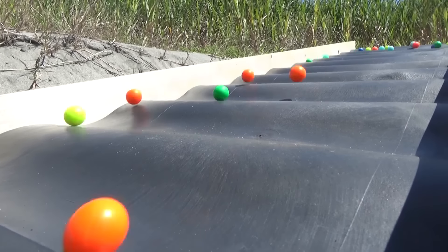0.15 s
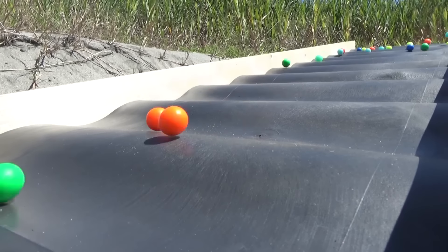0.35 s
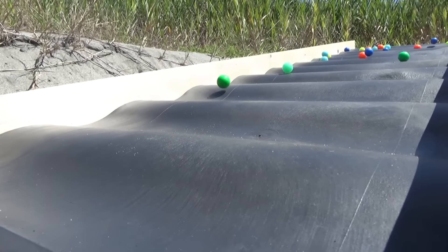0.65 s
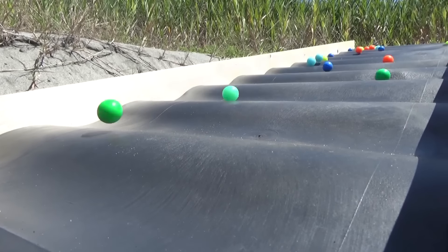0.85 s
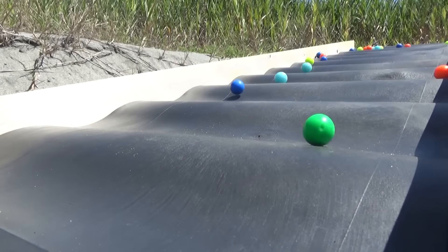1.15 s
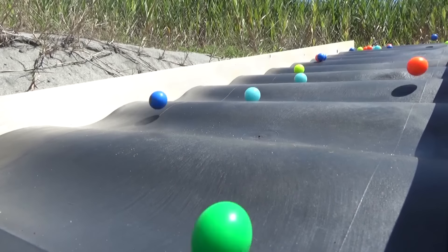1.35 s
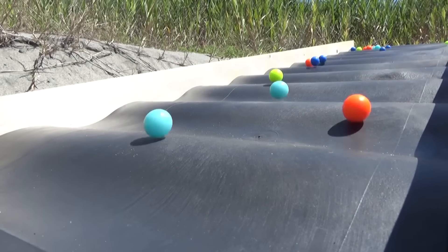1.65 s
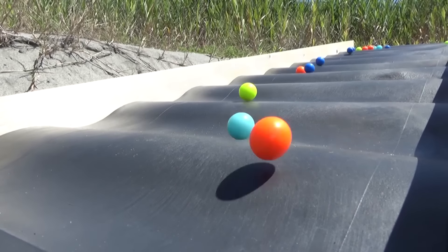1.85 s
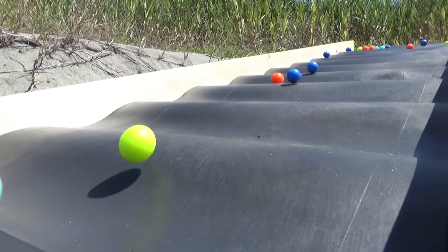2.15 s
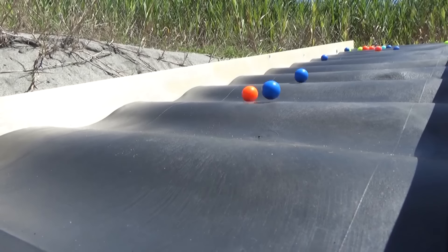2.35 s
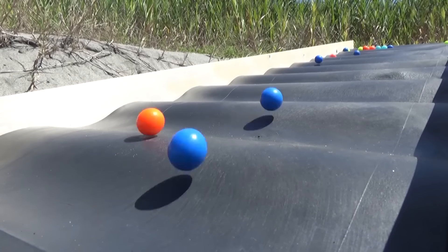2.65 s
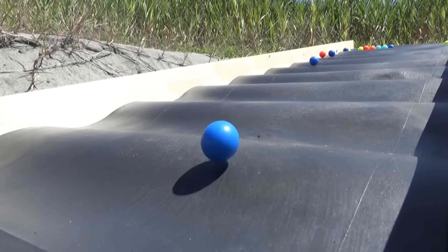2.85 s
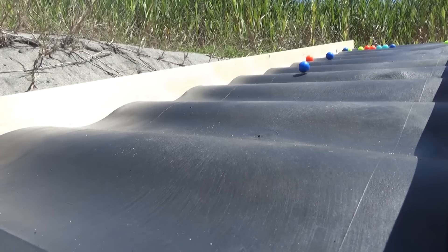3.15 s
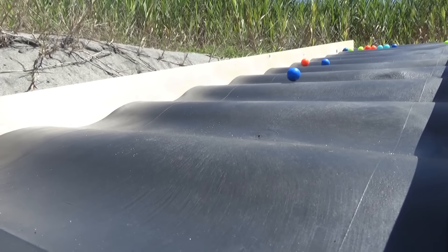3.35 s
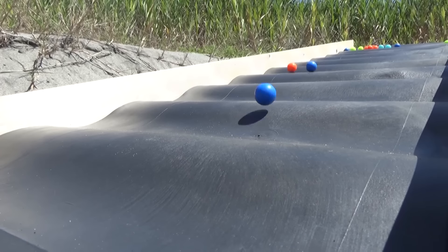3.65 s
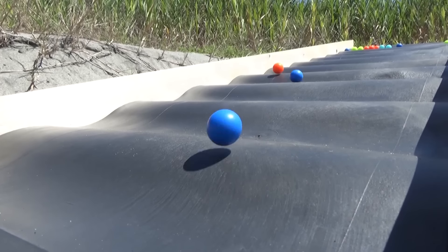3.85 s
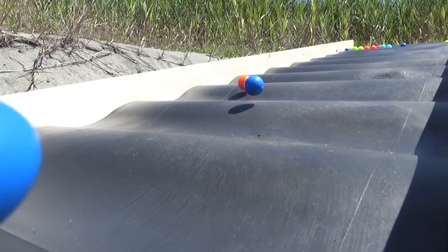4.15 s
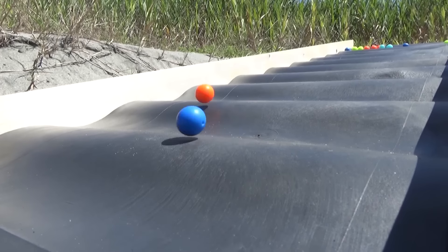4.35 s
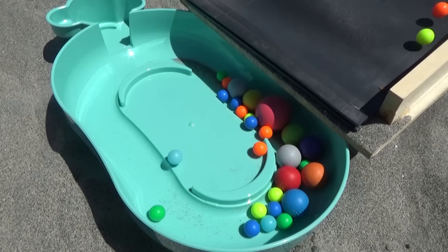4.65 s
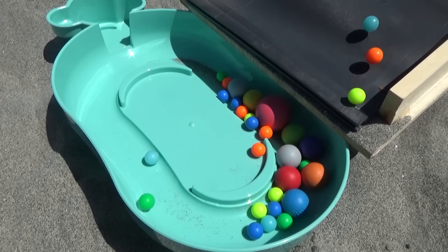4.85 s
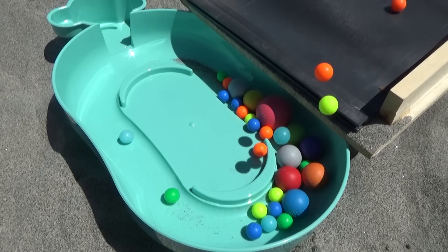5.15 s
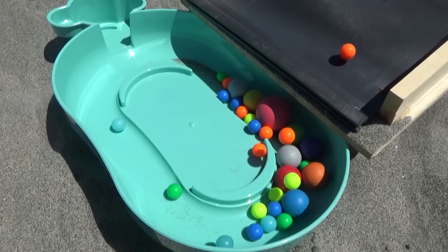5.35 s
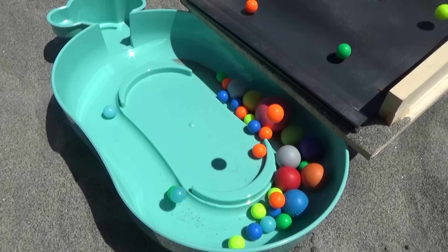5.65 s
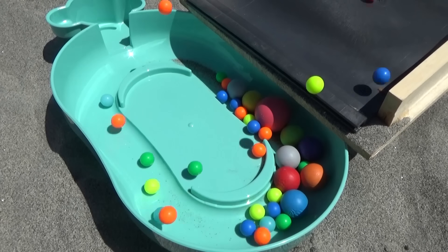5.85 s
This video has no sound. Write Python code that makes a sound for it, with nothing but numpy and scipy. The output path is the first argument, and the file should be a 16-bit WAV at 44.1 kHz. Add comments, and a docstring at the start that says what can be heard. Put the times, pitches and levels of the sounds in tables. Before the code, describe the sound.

Many small hard plastic balls bounce down a ridged plastic ramp close to the microphone, outdoors. A dense, bright clatter at full speed lasts about a second, then drops to half speed, with lower, duller, more separate knocks over soft rolling. Near the end a hollow plastic tub resonates with the hits, and the clatter jumps back to full speed.

```python
"""Balls on a ridged ramp

Small hard balls bounce down a ridged plastic ramp and drop into a plastic tub, close to the listener.
Each contact is an impulse that excites three sets of modes: the ball clicks, the sheet rings, the ramp thumps.
Farther balls patter and roll underneath as filtered noise and faint contacts, over a low rumble; the tub resonates.
The middle part plays at half speed, an octave lower; source frequencies and decays are as heard at half speed."""
import sys
import numpy as np
from scipy import signal
from scipy.fft import rfft, irfft, next_fast_len
from scipy.io import wavfile
from scipy.ndimage import uniform_filter1d, minimum_filter1d

SR = 44100
rng = np.random.default_rng(int(sys.argv[2]) if len(sys.argv) > 2 else 0)


def waveform_to_disk(signal):
    """Save audio, clipped to [-1, 1], as 16-bit WAV at the path in sys.argv[1]."""
    frames = np.transpose(np.atleast_2d(signal))
    scaled = np.clip(frames, -1, 1) * 32767
    samples = np.round(scaled).astype(np.int16)
    wavfile.write(sys.argv[1], SR, samples)


N = 265041

# Stretch heard at half speed: start_s, end_s [s]
HALF_SPEED = (1.085, 5.722)
OUTPUT_TIME = np.arange(N) / SR
IN_HALF_SPEED = (OUTPUT_TIME > HALF_SPEED[0]) & (OUTPUT_TIME < HALF_SPEED[1])
# The source sample behind each output sample: full speed skips every other one
CLOCK = np.cumsum(np.where(IN_HALF_SPEED, 1, 2))
M = CLOCK[-1] + SR  # source samples
TIME = np.interp(np.arange(M), CLOCK, OUTPUT_TIME)  # output time of each source sample (s)
TUB_FROM_S = 4.67  # the tub is heard from here on


def amp(db):
    """Level to gain: 20 dB is a factor of ten in amplitude."""
    return 10 ** (np.asarray(db) / 20)


def unit(x):
    """Normalisation to an rms of 1, so that levels can be set by gain alone."""
    return x / np.sqrt(np.mean(x ** 2) + 1e-20)


def along(points, hz):
    """Interpolation on a logarithmic frequency axis through (Hz, value) points."""
    f, value = np.transpose(points)
    return np.interp(np.log(hz + 1), np.log(f + 1), value)


def curves(rows):
    """Linear interpolation in output time: one value per source sample for each column after the time."""
    s, *columns = np.transpose(rows)
    return [np.interp(TIME, s, column) for column in columns]


def filtered(x, response):
    """Linear filtering: the spectrum is multiplied by a response of frequency."""
    m = next_fast_len(x.shape[-1] + 4096)
    spectrum = rfft(x, m) * response(np.fft.rfftfreq(m, 1 / SR))
    return irfft(spectrum, m)[..., :x.shape[-1]]


def mode(f, hz, width):
    """Damped harmonic resonance: unit gain at its centre, and a faster decay the wider it is."""
    return 1j * f * width / (hz * hz - f * f + 1j * f * width)


def rush(spectrum, patchy_db):
    """Coloured noise of rms 1: random gain over time-frequency patches makes it uneven, a spectrum shapes it."""
    z = signal.stft(rng.standard_normal(M), nperseg=256)[2]
    field = uniform_filter1d(rng.standard_normal(z.shape), size=5, axis=0)  # smooth in frequency
    field = uniform_filter1d(field, size=4, axis=1)  # smooth in time
    patches = z * amp(patchy_db * unit(field))
    noise = np.resize(signal.istft(patches, nperseg=256)[1], M)
    return unit(filtered(noise, lambda hz: amp(along(spectrum, hz))))


def struck(modes, at, db, contact_s, centre_hz, blow, tail_s, tail_db, tail_hz, soft_hz, size=2560):
    """Modal excitation: a blow, a rough contact and a duller scattered tail drive modes of random strength."""
    t, f = np.arange(size) / SR, np.fft.rfftfreq(size, 1 / SR)
    draw = rng.standard_normal((len(at), 2 * len(modes)))
    noise = rng.standard_normal((len(at), size))
    rough = noise * np.exp(-(t / np.maximum(contact_s, 1e-4)[:, None]) ** 1.4)
    rough[:, :1] = blow
    tail = noise[:, ::-1] * amp(tail_db - 60 * t / tail_s)
    dull_tail = rfft(tail) / (1 + 1j * f / tail_hz) ** 2
    push = (rfft(rough) + dull_tail) / (1 + 1j * f / soft_hz)
    body = 0
    for k, (hz, width, level) in enumerate(modes):
        # where the ball lands decides which modes speak
        level = level - 13 * np.log(hz / centre_hz) ** 2
        strength = amp(level + 2.02 * draw[:, [2 * k]])
        tuned_hz = hz * (1 + 0.019 * draw[:, [2 * k + 1]])
        body = body + (-1) ** k * strength * mode(f, tuned_hz, width)
    sound = irfft(push * body, size)
    sound *= (amp(db) / np.abs(sound).max(axis=1))[:, None]  # db sets the peak
    places = at[:, None] + np.arange(size)
    return np.bincount(places.ravel(), sound.ravel(), M + size)[:M]


# Modes of the ball, before the random spread: pitch_hz [Hz], width_hz [Hz], level_db [relative dB]
BALL_MODES = [(2010, 2350, -3), (3070, 450, 3), (3555, 727, -6), (5920, 1480, -7), (6680, 950, -12)]


def ball_clicks(at, db, ms):
    """Impulse response of a small hard body: high modes, broad and so quickly damped."""
    return struck(BALL_MODES, at, db - 0.5, ms * 0.00096, 3550, blow=40 / ms[:, None],
                  tail_s=0.044, tail_db=4.5, tail_hz=3720, soft_hz=12400)


# Modes of the sheet, before the random spread: pitch_hz [Hz], width_hz [Hz], level_db [relative dB]
SHEET_MODES = [(802, 118, -4), (1042, 79, 2), (1302, 242, -2.5), (1594, 574, -5.5)]


def sheet_rings(at, db, ms):
    """Plate vibration: middle modes, with a longer and softer contact than the click."""
    return struck(SHEET_MODES, at, db + 0.091, ms * 0.002, 1017, blow=70 / ms[:, None],
                  tail_s=0.11, tail_db=-0.5, tail_hz=2070, soft_hz=2620)


# Modes of the ramp, before the random spread: pitch_hz [Hz], width_hz [Hz], level_db [relative dB]
RAMP_MODES = [(137, 16, -3.5), (190, 39, -1.5), (262.6, 43, -0.5), (355, 129, -3.5), (471.6, 180, -3),
              (628, 100, -1)]


def ramp_thumps(at, db, ms, thump_hz):
    """Low modes of a large structure: the driving point sets the centre about which they speak."""
    return struck(RAMP_MODES, at, db - 4.5, ms * 0.00078, thump_hz[:, None], blow=70 / ms[:, None],
                  tail_s=0.2, tail_db=-5, tail_hz=1530, soft_hz=1190)


def contacts(at, click_db, ring_db, thump_db, ms, thump_hz):
    """Superposition of three bodies sharing one contact: the shorter it is, the harder its initial snap."""
    click = ball_clicks(at, click_db, ms)
    ring = sheet_rings(at, ring_db, ms)
    return click + ring + ramp_thumps(at, thump_db, ms, thump_hz)


# Near contacts, in output time; peak levels before each layer's fixed trim:
# start_s [s], click_db [dB], ring_db [dB], thump_db [dB]
BOUNCES = [(0.01, -3, -10.5, -12), (0.0134, -6.5, -19.5, -18.5), (0.0492, -5, -19.5, -6.5),
           (0.066, -6.5, -5, -4), (0.084, -14.5, -9, -9), (0.097, -14.5, -17, -7.5),
           (0.1106, -5.5, -13, -15.5), (0.1196, -7, -7.5, -17), (0.125, -5, -3, -20.5),
           (0.14, -7.5, -18, -18), (0.166, -12.5, -9, -15), (0.174, -7, -13, -11), (0.193, -12, -12, -5),
           (0.206, -12, -9, -9.5), (0.227, -14.5, -2, -5.5), (0.245, -2.5, -12, -15.5),
           (0.251, -16, -3, -8), (0.278, -7, -12, -13.5), (0.299, -9.5, -10.5, -7), (0.308, -9, -9.5, -12),
           (0.316, -20.5, -9.5, -8), (0.3267, -16, -9.5, -22), (0.351, -12.5, -5.5, -3.5),
           (0.3814, -7.5, -15.5, -22), (0.397, -18.5, -5, -8.5), (0.412, -7, -10.5, -14),
           (0.4304, -15.5, -12.5, -4.5), (0.443, -6, -8, -7.5), (0.469, -10.5, -5, -20),
           (0.491, -27, -10.5, -13), (0.501, -12.5, -4, 3.5), (0.511, -19.5, -13, -13.5),
           (0.517, -13.5, -12, -6.5), (0.532, -14.5, -3, -4.5), (0.545, -6, -9.5, -6.5),
           (0.56, -11, -10.5, -7.5), (0.616, 2.5, -12, -21.5), (0.623, -6.5, -10, -12),
           (0.6767, -8, -20.5, -4), (0.696, 0, -2, 2.5), (0.707, -10, -15.5, -19.5), (0.7328, -4, -4, -6),
           (0.7732, -5, -9, -19.5), (0.794, -3, -7.5, -3), (0.81, -8, -7.5, -5.5),
           (0.815, -13.5, -10.5, -1), (0.8313, -6, -10.5, -20), (0.849, -10, -4.5, -11),
           (0.855, -8, -10, -5), (0.887, -9, -5, -15.5), (0.893, -9, -8.5, -4.5), (0.9016, -10.5, -12, -9),
           (0.921, -12, -7.5, -9), (0.9333, -14, -11, -15.5), (0.962, -21.5, -15.5, -23.5),
           (1.012, -18.5, -5, -19), (1.032, -7, -6.5, -5.5), (1.056, -19, -11, -12), (1.076, -19, -8, -7),
           (1.163, -27, -18, -14.5), (1.1984, -14, -1, -7.5), (1.222, -32, -16, -4.5),
           (1.268, -5.5, -7.5, -12.5), (1.378, -20, -19, -21.5), (1.4004, 0.5, 0, 4),
           (1.444, -11.5, -5.5, -6), (1.462, -10, -19.5, -18.5), (1.482, -15, -21, -21.5),
           (1.491, -21.5, -15.5, -13), (1.526, -8.5, -7, -9), (1.538, -8.5, -10, -12),
           (1.557, -5, -7.5, -2.5), (1.602, -14, -6, -3.5), (1.637, -30, -23, -10),
           (1.656, -4.5, -5.5, -8.5), (1.671, -11.5, -11.5, -7), (1.703, -4, -5, -19),
           (1.7232, -10.5, -14, -7), (1.742, -10, -4, -11.5), (1.7475, -4, -7, -14.5),
           (1.768, -12, -6, -17), (1.782, -8, -7.5, -19.5), (1.839, -30, -16.5, -14), (1.87, -11, -4, -3.5),
           (1.885, -11.5, -6.5, -13.5), (1.953, 0.5, -14.5, -19), (1.9932, -13, -10.5, -19),
           (2.014, -28.5, -26, -20), (2.065, -5.5, -13.5, -17), (2.069, -1, -3, -13),
           (2.102, -20, -16.5, -12.5), (2.115, -22.5, -10.5, -15), (2.124, -18, -14, -6),
           (2.17, -5, -11.5, -18), (2.182, -7, -11, -17.5), (2.217, -9.5, -13, -15.5),
           (2.243, -3.5, -6, -4.5), (2.271, -5.5, -10, -14), (2.333, -16, -12, -14),
           (2.352, -29, -17.5, -16.5), (2.3917, -8, -12, -27), (2.416, -8, -4, -5.5),
           (2.433, -3.5, -8.5, -1.5), (2.464, -11.5, -10.5, -7), (2.509, -18, -14, -19),
           (2.5202, -21, -12.5, -8.5), (2.563, -26, -16.5, -29), (2.579, -35.5, -20.5, -20.5),
           (2.595, -15.5, -12, -12), (2.612, -17.5, -10.5, -14), (2.627, -12, -11, -15.5),
           (2.655, -2, -7.5, -11), (2.698, -7, -8.5, -6.5), (2.748, -17, -26, -25), (2.783, -8, -12.5, -28),
           (2.811, -6.5, -7, -6.5), (2.831, -15.5, -12, -6), (2.855, -19, -12, -20),
           (2.8984, -11, -1.5, -6), (3.01, -16, -7.5, -6), (3.015, -3, -5.5, -19.5), (3.039, -11, -16, -14),
           (3.054, -31, -18, -12.5), (3.1104, -11, -11, -16), (3.146, -8.5, -10, -15.5),
           (3.19, -21.5, -11.5, -13.5), (3.251, -6.5, -8, -6.5), (3.263, -8, -7, -8.5),
           (3.29, -6.5, -2, -3.5), (3.337, -5, -7.5, -35), (3.3687, -6, -10.5, -26),
           (3.392, -20, -11, -8.5), (3.428, -29, -21.5, -11.5), (3.443, -21, -14.5, -24),
           (3.462, -24, -16, -10), (3.485, -6, -7.5, -5), (3.505, -6, -9, -6.5), (3.531, -18.5, -6.5, -6),
           (3.546, -11, -10.5, -13.5), (3.573, -5.5, -11.5, -30), (3.593, -5.5, -11.5, -16),
           (3.641, -21.5, -17, -22), (3.687, -18, -22.5, -30), (3.785, -4, -5.5, -6.5),
           (3.849, -4, -5.5, -11), (3.861, -14.5, -12, -6.5), (3.909, -17.5, -13.5, -9.5),
           (3.916, -15.5, -13.5, -9.5), (3.984, -10.5, -15.5, -5.5), (4.09, -7.5, -9, -13.5),
           (4.148, -23, -11.5, -13.5), (4.1776, -6.5, -10.5, -11.5), (4.2048, -12.5, -12.5, -19.5),
           (4.251, -18, -14.5, -11), (4.294, -4, -17, -20.5), (4.311, -28, -22, -25),
           (4.3823, -10.5, -13.5, -13), (4.417, -47, -24.5, -15), (4.475, -13.5, -6, -13),
           (4.566, -12.5, -12, -14), (4.605, -12.5, -10, -12.5), (4.652, -26.5, -10.5, -9),
           (4.7141, -2.5, -10, -5.5), (4.7538, -20.5, -17, -5.5), (4.761, -10, -3, -3),
           (4.771, -7, -6, -13), (4.7896, -17.5, -17, -28), (4.805, -15, -6.5, -12.5),
           (4.839, -20, -9.5, -19), (4.854, 0.5, -6.5, -21), (4.89, -15, -4.5, -5),
           (4.923, -16.5, -11.5, -18), (4.96, -14.5, -3, -11.5), (5.008, -13, -8, -17.5),
           (5.02, -7.5, -15, -13), (5.031, -13, -10.5, -22), (5.06, -13.5, -6, -9.5), (5.09, -23, -6, -10),
           (5.107, -18.5, -11, -11), (5.1319, -19.5, -9, -4), (5.193, -11.5, -8.5, -8.5),
           (5.22, -35, -9, -6), (5.258, -15, -14, -15), (5.291, -24, -19, -24), (5.313, -14, -8, -10),
           (5.34, -25, -8.5, -2), (5.376, -6, -14.5, -20), (5.413, -14.5, -18.5, -14),
           (5.439, -5, -31.5, -8), (5.465, 2, -7.5, -31), (5.5165, -12, -14, -12.5), (5.532, -3, -9.5, -2),
           (5.579, -14.5, -8.5, -9.5), (5.608, -25, -20, -17.5), (5.62, -1.5, -4, -20),
           (5.662, -13.5, -13.5, -12.5), (5.6882, -18.5, -10.5, -10), (5.732, 0, -8, -17.5),
           (5.745, -10.5, -22.5, -14.5), (5.752, -4.5, -10, -15.5), (5.762, -14, -5, -6),
           (5.801, -4.5, -2.5, -11), (5.808, -13, -12.5, -13), (5.817, -10, -8.5, -10),
           (5.826, -7.5, -5, -5), (5.838, -5.5, -2.5, -12), (5.849, -11.5, -6.5, -5),
           (5.8714, -5, -16.5, -12), (5.879, 0, -1.5, -14.5), (5.898, -10, -10, -19.5),
           (5.9033, -2.5, -4.5, -7), (5.93, -1.5, -5, -7.5), (5.96, -8, -8, -19), (5.9702, -1, -1.5, -17),
           (5.998, -9, -4.5, -20)]
# Usual centre of the thump, before chance: start_s [s], pitch_hz [Hz]
THUMP_CENTRE = [(0, 428), (1.2, 382), (1.7, 400), (2.5, 496), (3.6, 470), (3.8, 233), (4.0, 220),
                (4.1, 500), (4.7, 410), (6.01, 388)]
CONTACT_MS = 5.2  # usual contact before chance; each layer scales it
SOFTER, CONTACT_SCATTER_DB = 0.19, 3  # dB longer per dB that the ring tops the click; chance
THUMP_SCATTER = 0.13  # spread of the log centre from one landing place to the next


def near_bounces():
    """Contact duration and brightness: a dull click means a long soft contact; the landing place is chance."""
    s, click_db, ring_db, thump_db = np.transpose(BOUNCES)
    draw = rng.standard_normal((len(s), 2))
    longer_db = SOFTER * (ring_db - click_db) + CONTACT_SCATTER_DB * draw[:, 0]
    ms = CONTACT_MS * amp(np.clip(longer_db, -12, 9))
    at = CLOCK[np.round(s * SR).astype(int).clip(0, N - 1)]
    thump_hz = np.interp(s, *np.transpose(THUMP_CENTRE)) * np.exp(THUMP_SCATTER * draw[:, 1])
    return contacts(at, click_db, ring_db, thump_db, ms, thump_hz)


# Farther balls, levels before the mix trims: start_s [s], rolling_db [dB], patter_db [dB]
CROWD = [(0.0, -18, -27), (0.32, -19, -34), (0.92, -21.5, -29.5), (1.25, -19, -51.5), (1.62, -19.5, -26.5),
         (1.91, -23, -38.5), (2.66, -22.5, -33), (3.08, -35.5, -50), (3.4, -23, -27.5), (3.75, -27, -42.5),
         (4.07, -21.5, -43), (4.45, -31, -49), (4.6, -23.5, -44.5), (4.79, -20, -20), (4.9, -21.5, -37.5),
         (6.01, -22.5, -29.5)]


def crowd_levels():
    """Slow amplitude envelopes of the rolling and the patter."""
    return curves(CROWD)


# Rolling spectrum: pitch_hz [Hz], level_db [relative dB per Hz]
ROLL_SPECTRUM = [(35, -21), (60, 4), (590, 13.5), (743, 8), (996, 3.5), (2260, -16.5), (3290, -34),
                 (3970, -48), (5790, -50.5), (8100, -84.5), (9000, -43), (11700, -88), (19800, -120)]


def rolling():
    """Roughness excitation: balls rolling on the rough sheet make patchy coloured noise."""
    return rush(ROLL_SPECTRUM, patchy_db=5.0)


# Fizz spectrum: pitch_hz [Hz], level_db [relative dB per Hz]
FIZZ_SPECTRUM = [(1200, -14), (2200, 12), (3200, 13), (4200, -3), (6000, -16), (8500, -17)]


def fizz():
    """Dense impacts fuse into noise: a fine, patchy fizz."""
    return rush(FIZZ_SPECTRUM, patchy_db=6)


def patter(count=520):
    """Distance dulls the treble: many faint bounces farther up the ramp, low-passed and melting into fizz."""
    draw = rng.random((count, 4))
    at = (draw[:, 0] * (M - 1)).astype(int)
    db = -2.2 * np.log(draw[:, 1] + 1e-2)  # a few stand out
    ms = 3.0 + 6 * draw[:, 2]
    thump_hz = 250 + 300 * draw[:, 3]
    far = contacts(at, db, db + 6, db - 0.5, ms, thump_hz)
    dulled = filtered(far, lambda hz: 1 / (1 + 1j * hz / 4000))
    return unit(dulled) + amp(-15) * fizz()


# Rumble spectrum: pitch_hz [Hz], level_db [relative dB per Hz]
RUMBLE_SPECTRUM = [(15, -4.5), (25, 2.5), (60, -4), (120, 4.5), (200, -45.5)]
# Rumble levels: by_ramp_db, by_tub_db [dB]
RUMBLE_LEVELS = (-41, -36)


def rumble(patchy_db):
    """Low-frequency noise, with one level by the ramp and another by the tub."""
    level_db = np.where(TIME > TUB_FROM_S, RUMBLE_LEVELS[1], RUMBLE_LEVELS[0])
    return amp(level_db) * rush(RUMBLE_SPECTRUM, patchy_db)


# Modes of the tub: pitch_hz [Hz], width_hz [Hz], level_db [dB]
TUB_MODES = [(346, 67, 0), (440, 16, -9.5), (640, 17, -13), (1035, 40, 0), (2340, 110, 1.5)]


def tub(x):
    """Forced resonance: the hollow tub hums along with whatever knocks and rolls in it."""
    def response(f):
        return sum((-1) ** k * amp(db) * mode(f, hz, width) for k, (hz, width, db) in enumerate(TUB_MODES))
    return filtered(x * (TIME > TUB_FROM_S), response)


# Left lean by frequency: pitch_hz [Hz], share [of the lean's side signal]
LEAN_SHARE = [(30, -.3), (60, -0.63), (150, 1.57), (380, 0.97), (950, 0.76), (2400, 0.68), (6000, 0.12)]
# Left over right where the share is 1: start_s [s], lean_db [dB]
LEAN_LEVEL = [(0, 4), (0.95, 4.5), (1.1, .5), (1.6, 3.5), (4.05, 5.5), (4.67, 1.5), (6.01, 0)]


def leaning(mono):
    """Interaural level difference: a side signal leans the sound left, mostly in the low middle."""
    lean_db, = curves(LEAN_LEVEL)
    # tanh turns a left-to-right level ratio into a side-to-mid ratio
    return np.tanh(lean_db * np.log(10) / 40) * filtered(mono, lambda hz: along(LEAN_SHARE, hz))


def scattered(mono):
    """Diffuse reflection: convolution with decaying noise spreads the sound, more in the treble."""
    t = np.arange(2000) / SR
    walls = rng.standard_normal(2000) * amp(-60 * t / 0.041)
    diffuse = signal.fftconvolve(mono, walls / np.linalg.norm(walls))[:M]
    return filtered(diffuse, lambda hz: 1 + hz / 3500)


def played(x):
    """Time scaling: band-limited, then read at half speed or, an octave higher, at full speed."""
    def band(hz):
        faint_top = amp(-16.0) * (hz < 10200)  # a weaker share reaches higher
        return 1 / (1 + (hz / 8500) ** 30) + faint_top
    return filtered(x, band)[..., CLOCK]


def scene():
    """Superposition in mid and side: near bounces over the crowd, the tub and the rumble, leaning left."""
    roll_db, patter_db = crowd_levels()
    bounces = near_bounces()
    roll = amp(roll_db - 5.5) * rolling()
    mono = bounces + roll + amp(patter_db + 3.5) * patter() + rumble(patchy_db=1.5)
    mono = mono + tub(amp(-7.0) * bounces + amp(6.5) * roll)
    side = leaning(mono) + amp(-26.5) * scattered(mono)
    side = side + amp(-24.0) * rumble(patchy_db=10.5)
    return played(np.array([mono + side, mono - side]))


def record(dry):
    """Fast limiting lets the first swing of a hit through and holds down the rest; a low-pass ends the band."""
    hold, smooth = 160, 40  # samples, both looking back
    needed = np.clip(.6 / (np.abs(dry).max(axis=0) + 1e-9), 0, 1) ** .8
    held = minimum_filter1d(needed, size=hold, origin=hold // 2 - 1)
    gain = uniform_filter1d(held, size=smooth, origin=smooth // 2 - 1)
    limited = dry * gain
    soft = limited / (1 + np.abs(limited) ** 8) ** (1 / 8)  # peaks saturate towards 1
    return filtered(soft, lambda hz: hz < 16300)


dry = scene()
out = record(dry)
waveform_to_disk(out)
```